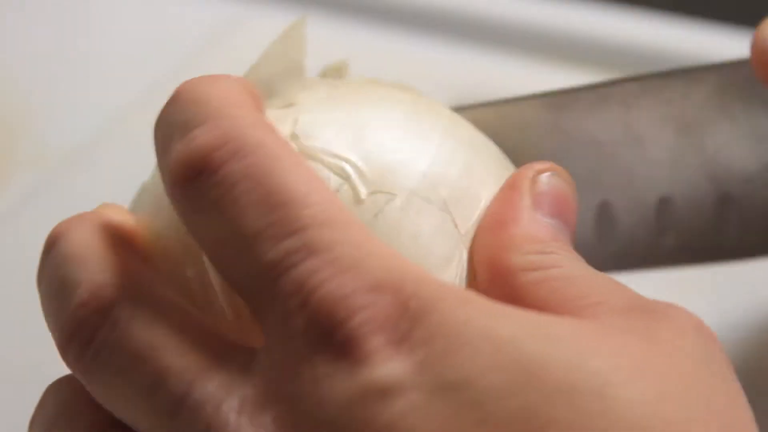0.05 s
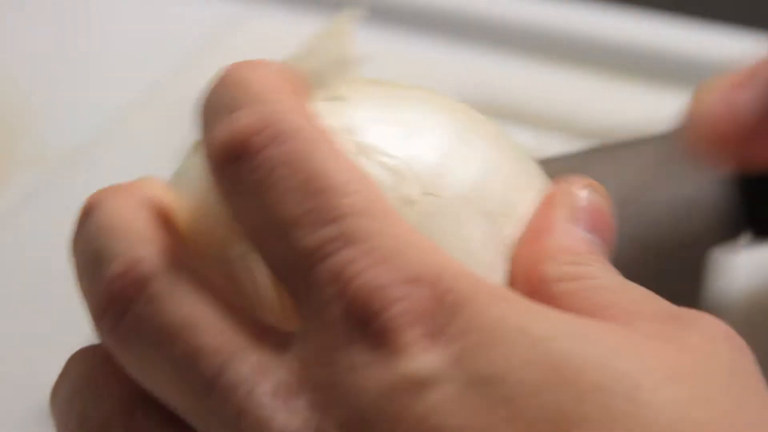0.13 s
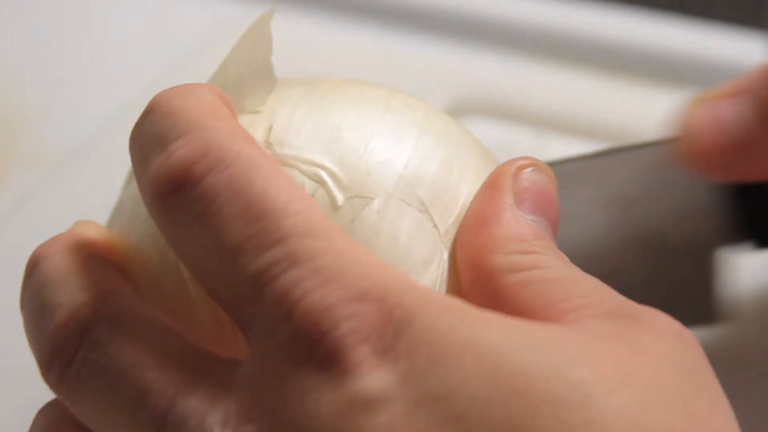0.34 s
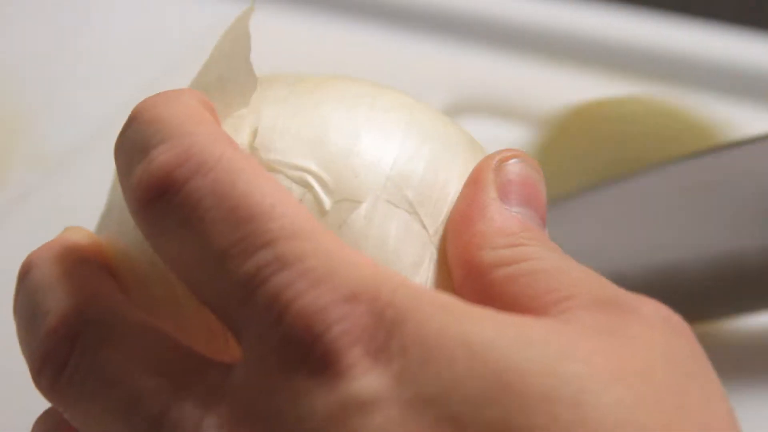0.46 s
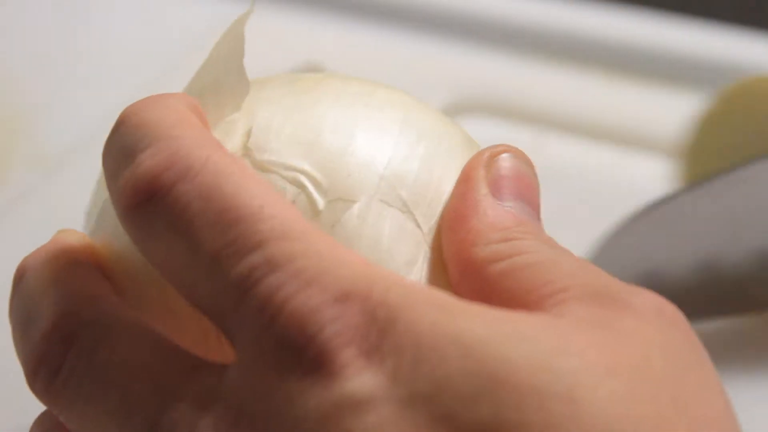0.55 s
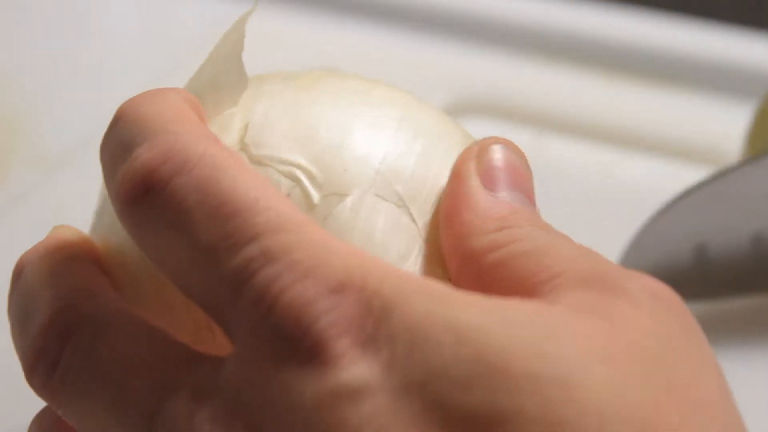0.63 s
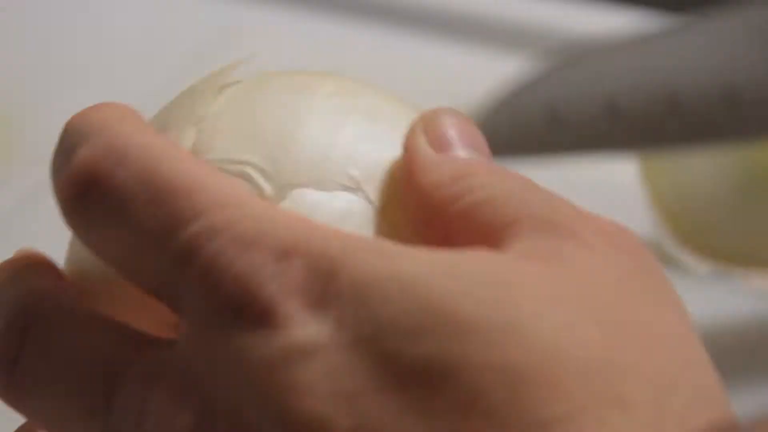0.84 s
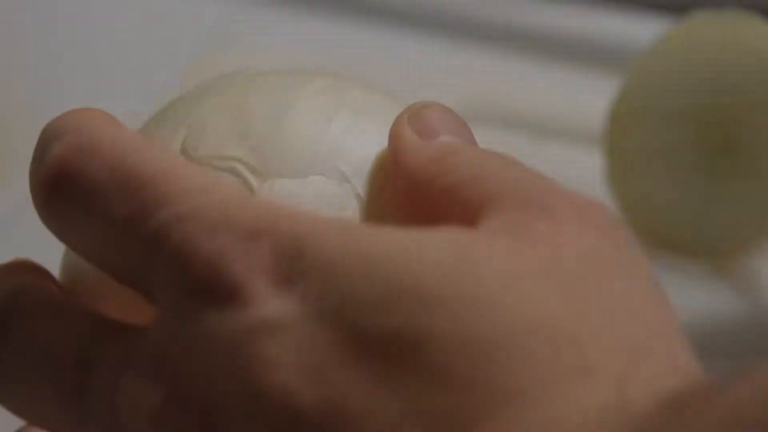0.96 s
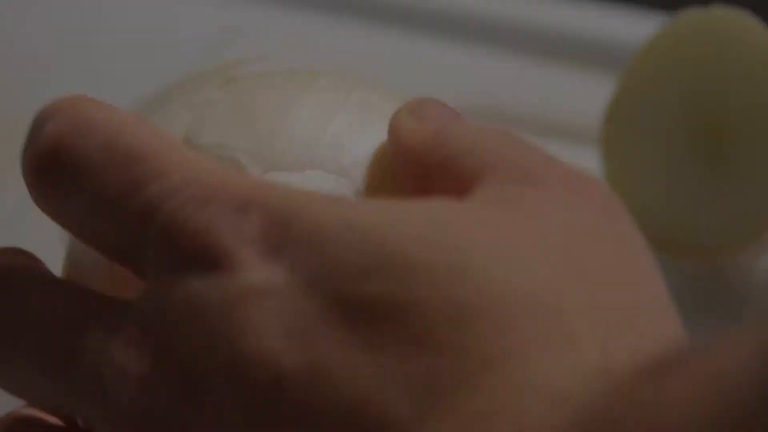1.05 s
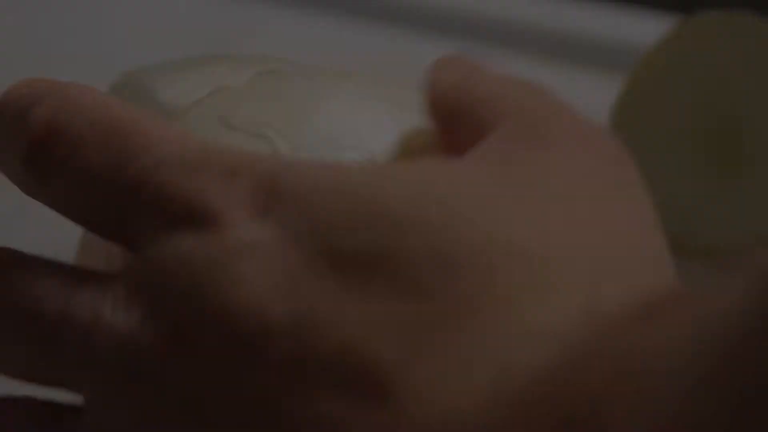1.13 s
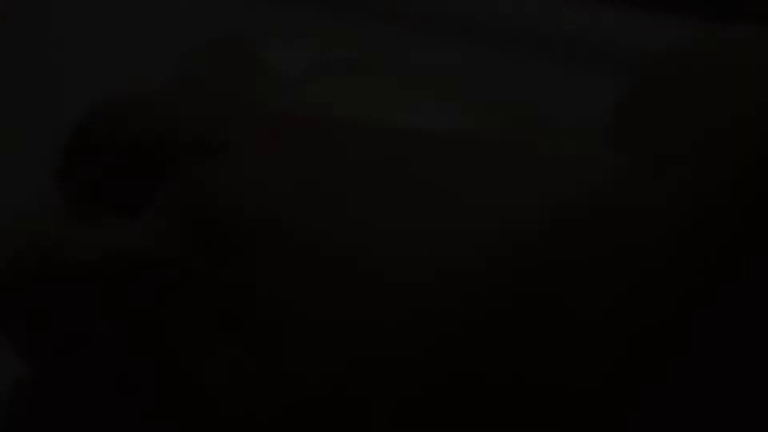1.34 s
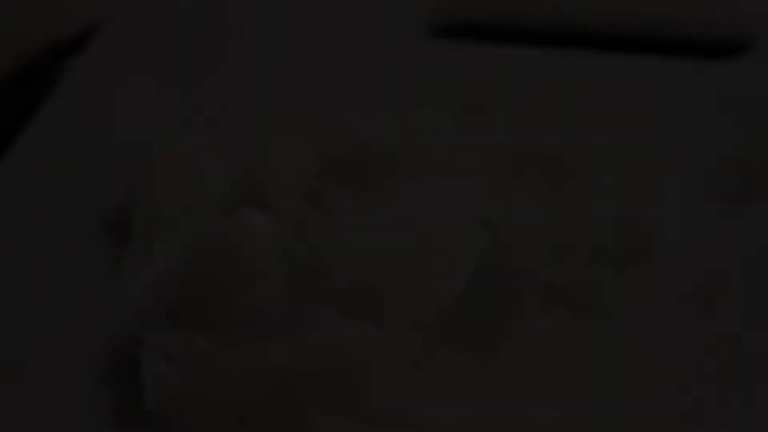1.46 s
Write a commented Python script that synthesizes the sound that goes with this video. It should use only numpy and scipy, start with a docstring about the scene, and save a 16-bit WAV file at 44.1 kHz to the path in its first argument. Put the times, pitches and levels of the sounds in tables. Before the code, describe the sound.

An onion is cut up close in a small kitchen. Dry skin snaps as the blade rasps through, crunching fastest around 0.15-0.25 s; a loud hollow chop hits the plastic board at 0.22 s, with small knocks just after. Sharp crackles follow near 0.4 s over a soft, faintly groaning scrape until 0.75 s. A light knock comes at 0.8 s, then sparse papery snaps and finger rustles to about 1.45 s over faint room noise.

```python
"""Knife through an onion

A kitchen knife rasps down through an onion (dense grains of noise) and chops onto a plastic board
(damped modes, thud, crack). The blade scrapes back out over a groaning board and knocks once more.
Dry skin snaps throughout (short resonant bursts), then also rustles under the fingers (grains again).
Close, nearly mono pickup in a small kitchen: only reflections and the noise floor have width.
"""
import sys
import numpy as np
from scipy import signal
from scipy.fft import rfft, irfft, next_fast_len
from scipy.io import wavfile
from scipy.ndimage import map_coordinates

SR = 44100
rng = np.random.default_rng(int(sys.argv[2]) if len(sys.argv) > 2 else 0)


def log_audio(samples):
    """Write samples as a 16-bit WAV file to the path given in sys.argv[1]."""
    # one column per channel
    frames = np.atleast_2d(samples).T
    # limit to full scale, then quantise
    limited = np.clip(frames, -1, 1)
    pcm = np.round(limited * 32767).astype(np.int16)
    wavfile.write(sys.argv[1], SR, pcm)


N = 66150

NEAR_DELAY_S = 0.0026  # no reflection arrives earlier


def amp(db):
    """Amplitude factor of a level in dB."""
    return 10 ** (np.asarray(db) / 20)


def unit(x):
    """x at rms 1."""
    return x / np.sqrt(np.mean(x ** 2) + 1e-20)


def along(points, hz):
    """Interpolate (Hz, value) points on a log frequency axis."""
    f, v = np.transpose(points)
    return np.interp(np.log(hz + 1), np.log(f + 1), v)


def clock():
    """Time of each sample, s."""
    return np.arange(N) / SR


def level(rows):
    """Gain per sample from (s, dB) points; -120 dB outside them."""
    s, db = np.transpose(rows)
    return amp(np.interp(clock(), s, db, left=-120, right=-120))


def filtered(x, response):
    """x times a response of frequency, zero-padded by at least 0.5 s."""
    m = next_fast_len(N + SR // 2)
    spectrum = rfft(x, m) * response(np.fft.rfftfreq(m, 1 / SR))
    return irfft(spectrum, m)[..., :N]


def coloured(x, colour):
    """x shaped by (Hz, dB) points, at rms 1."""
    return unit(filtered(x, lambda f: amp(along(colour, f))))


def band(hz, q):
    """Noise through two equal resonances in series, at rms 1."""
    def resonance(f):
        damping = 1j * f * hz / q
        return (damping / (hz * hz - f * f + damping)) ** 2
    return unit(filtered(rng.standard_normal(N), resonance))


def burst(noise, envelope):
    """Noise under an envelope, holding exactly the envelope's energy."""
    x = noise * envelope
    return x * np.linalg.norm(envelope) / (np.linalg.norm(x) + 1e-20)


def tear(s, length, fall):
    """Exponential rise up to s, hold for length, exponential fall."""
    rise_s = 0.00077
    t = clock() - s
    return np.exp(np.minimum(t, 0) / rise_s - np.maximum(t - length, 0) / fall)


def grains(colour):
    """Dense tiny fractures of uneven size whose strength flutters; rms 1."""
    grains_per_s, spread_db = 4000, 2.5
    flutter_db, flutter_per_s = 1.5, 170
    fractures = (rng.random(N) < grains_per_s / SR) * rng.choice([-1, 1], N)
    sizes = amp(spread_db * rng.standard_normal(N))
    clumps = map_coordinates(rng.standard_normal(N // 10), [clock() * flutter_per_s])
    return coloured(fractures * sizes * amp(flutter_db * clumps), colour)


def ring(modes, t, contact):
    """Damped modes, set moving by a contact of the given length at t = 0."""
    total = 0
    for hz, db, t60 in modes:
        decay = amp(db + rng.normal(0, 1) - 60 * t / t60)  # each mode's level varies by about 1 dB
        total = total + decay * np.cos(2 * np.pi * hz * t)
    return (1 - np.exp(-t / contact)) * total


def floor():
    """Mid and side of the room's rumble and faint hiss: steady coloured noise."""
    # noise spectrum: f/Hz, density/dB
    floor_colour = [(20, -2.5), (40, -0.5), (70, -14.5), (110, -26), (160, -21), (215, -10.5), (330, -18.5),
                    (1000, -23), (3000, -28), (7000, -22.5), (15500, -25.5)]
    # stereo width: f/Hz, side re mid/dB
    floor_width = [(30, -3.5), (200, -16), (1000, -11.5), (3000, -4.5), (10000, 1)]
    floor_db = -64
    mid, side = amp(floor_db) * coloured(rng.standard_normal((2, N)), floor_colour)
    return np.array([mid, filtered(side, lambda f: amp(along(floor_width, f)))])


def slicing():
    """The edge breaks through skin and cells: many tiny fractures."""
    # blade going through the onion: t/s, level/dB
    slice_level = [(0, -44), (.024, -46), (.04, -45.5), (.066, -39.5), (.088, -39.5), (.115, -44.5),
                   (.136, -57), (.158, -51.5), (.168, -35), (.192, -34.5), (.218, -30.5), (.235, -33.5),
                   (.265, -37.5), (.285, -45), (.31, -43), (.34, -67)]
    # slicing spectrum: f/Hz, density/dB
    slice_colour = [(200, -44.5), (380, -23.5), (550, -3.5), (850, -15), (1250, -4), (2000, -14),
                    (4200, -8.5), (6600, 1), (9000, -5.5), (12500, -5), (15500, -11.5)]
    return level(slice_level) * grains(slice_colour)


def snaps():
    """A flake of skin tears at its own pitch and knocks the bulb; each scatters from its own place."""
    # dry skin snapping: t/s, level/dB, pitch/Hz, Q/1, tear length/s, bulb knock re flake/dB
    snap_rows = [(0.017, -42, 6950, 0.95, 0.0057, -9), (0.024, -39.5, 7000, 0.45, 0.0059, -10.5),
                 (0.0747, -24.5, 7760, 1.7, 0.00011, -34), (0.078, -30.5, 8440, 1.1, 0.0004, -13),
                 (0.1626, -34, 11000, 0.41, 0.0011, -12.5), (0.1667, -27, 7840, 1.4, .0004, -51),
                 (0.1726, -28, 6840, 0.8, 0.00052, -16), (0.2603, -28.5, 9700, 1.7, 0.00055, 0),
                 (0.395, -43, 7100, 7.1, .0004, -29), (0.4039, -29.5, 7940, 8.2, 0.00019, -27),
                 (0.415, -32, 6600, 0.24, 0.0072, -15), (0.417, -24.5, 12200, 1.35, .001, -27),
                 (0.445, -42.5, 5760, 1.4, 0.0057, -41), (.526, -46, 8100, 1.2, 0.0014, -32),
                 (0.5756, -46, 10300, 3.1, 0.00082, -12.5), (0.5898, -35, 8100, 1.2, 0.00014, -30.5),
                 (0.6019, -39.5, 7370, 0.66, 0.00017, -34), (0.6388, -44, 6570, 0.69, 0.00022, -20),
                 (0.6758, -42.5, 12200, 1.2, 0.0011, -35), (.692, -50, 6130, 1.17, 0.0012, -18),
                 (0.8, -45, 6700, 2.7, .005, -20), (0.8163, -40, 7900, 0.3, 0.0013, -3),
                 (0.8825, -40, 7300, 1.3, 0.001, -7.5), (.9079, -35.5, 7790, 1.55, 0.0023, -22),
                 (0.9178, -35, 8700, 1.84, 0.00082, -9), (0.9609, -51.5, 7030, 0.9, 0.00039, -6.5),
                 (0.9676, -40.5, 10090, 0.95, 0.00091, -31), (1.1231, -33, 9200, 1.04, 0.0059, -51),
                 (1.1814, -30.5, 7600, 1.6, 0.0022, -27), (1.1841, -42, 2600, 4.2, 0.00057, -37),
                 (1.3523, -42.5, 8560, .5, 0.00023, -35), (1.435, -46.5, 6950, 0.53, 0.00049, -24)]
    # weighting of the flakes: f/Hz, gain/dB
    skin_colour = [(500, -26), (1500, -12.5), (2600, -8), (4000, 3), (15500, 2)]
    flake_fall_s = 0.00085
    bulb_hz, bulb_q, bulb_fall_s = 1330, 4.5, .0018
    out = np.zeros((2, N))
    for s, db, hz, q, length, bulb_db in snap_rows:
        flake = burst(coloured(band(hz, q), skin_colour), tear(s, length, flake_fall_s))
        bulb = burst(band(bulb_hz, bulb_q), tear(s, length, bulb_fall_s))
        out += scattered(amp(db) * (flake + amp(bulb_db) * bulb))
    return out


def groans():
    """The blade catches and makes the board groan: narrow noise swelling and fading."""
    # groans: t/s, length/s, level/dB, f/Hz
    groan_rows = [(0.08, 0.017, -54, 594), (0.43, 0.075, -53.5, 715), (0.618, 0.051, -59.5, 620),
                  (0.676, 0.078, -55.5, 584)]
    groan_q = 6
    out = np.zeros(N)
    for s, length, db, hz in groan_rows:
        phase = np.clip((clock() - s) / length, 0, 1)
        swell = np.sin(np.pi * np.sqrt(phase))  # peaks a quarter of the way in
        out += amp(db) * burst(band(hz, groan_q), swell)
    return out


def chops():
    """Each blow cracks and rings board and blade; only mid-board blows thud and move the worktop."""
    # blows: t/s, level/dB, edge crack/dB rel., steel ring/dB rel., contact time/s, place on the board
    chop_rows = [(0.2200, 2, 0, -6, 0.0004, "middle"), (.2565, -25, -3, -12.5, .003, "middle"),
                 (0.2623, -22.5, 4.5, -18, 0.00084, "middle"), (.7968, -26, -2, -21, 0.0012, "rim")]
    # modes of the board with the onion on it: f/Hz, struck mid-board/dB, struck at the rim/dB, t60/s
    board = [(377, -12.5, -21, .06), (519, -20.5, -17, .045), (605.7, -17.5, -11, .045),
             (734, -21, -13, .04), (789.6, -17, -15.5, 0.044), (1018, -10.5, -18, 0.037),
             (1190, -16.5, -11, 0.054), (1245.4, -18.5, -12.5, .05), (1414, -15, -19, 0.049),
             (1817, -33, -17.5, 0.065), (2386, -22.5, -20, 0.036)]
    # modes of the blade: f/Hz, level/dB, t60/s
    steel = [(5540, -31, 0.15), (6340, -41, 0.11), (8130, -32, 0.19)]
    # modes of the worktop: f/Hz, level/dB, t60/s
    push = [(65, -39.5, 0.14), (118, -43, 0.077), (93, -55.5, 0.54), (161, -56.5, 0.33)]
    # crack of the edge landing: f/Hz, density/dB
    crack_colour = [(900, -7), (2050, -2), (2650, 5), (4000, -0.5), (7200, -2), (9500, -15.5),
                    (15500, -29.5)]
    thud_db, thud_t60_s, thud_low_hz, thud_high_hz = -10, 0.043, 330, 1340
    crack_level_db, crack_t60_s = -15.5, 0.031
    shove_db = 1  # single shove opening a thud, re the crush that follows
    blow_low_hz = 300  # low cut: keeps the summed modes and thud from booming in the bass
    body = signal.butter(4, [thud_low_hz, thud_high_hz], "band", fs=SR, output="sos")
    low_cut = signal.butter(6, blow_low_hz, "high", fs=SR, output="sos")

    out = np.zeros(N)
    for s, db, crack_db, steel_db, contact, place in chop_rows:
        t = np.maximum(clock() - s, 0)
        middle = place == "middle"

        fade = (t > 0) * amp(thud_db - 60 * t / thud_t60_s)
        shove = signal.unit_impulse(N, round(s * SR)) * amp(shove_db) * np.linalg.norm(fade)
        crush = rng.standard_normal(N) * fade
        thud = signal.sosfilt(body, shove + crush)
        thud = thud * np.linalg.norm(fade) / np.linalg.norm(thud)

        crack_fade = (t > 0) * amp(crack_level_db - 60 * t / crack_t60_s)
        crack = burst(coloured(rng.standard_normal(N), crack_colour), crack_fade)

        modes = [(hz, middle_db if middle else rim_db, t60) for hz, middle_db, rim_db, t60 in board]
        blow = ring(modes, t, contact) + middle * thud
        blow = blow + amp(crack_db) * crack + amp(steel_db) * ring(steel, t, contact)
        worktop = middle * ring(push, t, contact)
        out += amp(db) * (signal.sosfilt(low_cut, blow) + worktop)
    return out


def drawing():
    """The blade scrapes back along the board: grains again, darker."""
    # blade drawn back: t/s, level/dB
    draw_level = [(.37, -55), (.41, -50.5), (.445, -48), (.49, -49), (.53, -50.5), (.565, -54),
                  (.61, -55.5), (.665, -63.5), (.693, -55), (.715, -62.5), (.77, -67.5)]
    # scraping spectrum: f/Hz, density/dB
    draw_colour = [(200, -15.5), (380, -5.5), (560, -2.5), (760, -0.5), (900, -4), (1180, 0.5), (2000, -16),
                   (3500, -9), (7000, -7), (15500, -12)]
    return level(draw_level) * grains(draw_colour)


def rubs():
    """Fingers shift their grip on the papery skin: grains under Gaussian swells."""
    # finger slides: t of the middle/s, half width (sigma)/s, level/dB
    rub_rows = [(0.88, .016, -55), (0.92, 0.006, -49), (0.967, 0.012, -57.5), (1.139, 0.025, -60),
                (1.18, 0.013, -60), (1.319, 0.005, -59.5), (1.379, 0.012, -57), (1.44, 0.0062, -62.5)]
    # rustle spectrum: f/Hz, density/dB
    rub_colour = [(300, -12), (900, -8), (1350, -1), (2200, -6.5), (4000, -2.5), (8000, 3), (11500, -1),
                  (15500, -15)]
    swells = sum(amp(db) * np.exp(-((clock() - s) / width) ** 2 / 2) for s, width, db in rub_rows)
    return grains(rub_colour) * swells


def scattered(x):
    """Mid and side of a sound plus the treble that hands and worktop throw back at once."""
    near_db, near_t60_s, near_low_hz = -8.5, 0.072, 1800
    t = clock()[:SR // 12]
    high_pass = signal.butter(2, near_low_hz, "high", fs=SR, output="sos")
    near = signal.sosfilt(high_pass, rng.standard_normal((2, len(t))))
    near = near * amp(-60 * t / near_t60_s) * (t > NEAR_DELAY_S)
    near = near / np.linalg.norm(near[0])
    mid, side = amp(near_db) * signal.oaconvolve(x[None], near, axes=1)[:, :N]
    return np.array([x + mid, side])


def kitchen(x):
    """Mid and side of the room's tail: noise in which each frequency dies at its own speed."""
    # room decay: f/Hz, t60/s
    room_t60 = [(100, 0.54), (400, 0.28), (1300, .25), (2400, .32), (7000, 0.15), (15000, 0.1)]
    kitchen_db = -13.5
    hz, t, z = signal.stft(rng.standard_normal((2, SR // 2)), SR, nperseg=256)
    decay = amp(-60 * t / along(room_t60, hz)[:, None])
    tail = signal.istft(z * decay, SR, nperseg=256)[1]
    tail = tail * (clock()[:tail.shape[1]] > NEAR_DELAY_S)
    tail = tail / np.linalg.norm(tail[0])
    return amp(kitchen_db) * signal.fftconvolve(x[None], tail, axes=1)[:, :N]


def scene():
    """All sources in the middle; only reflections and the floor differ between the ears."""
    # width of the reflections: f/Hz, side gain/dB
    reflection_width = [(100, -7), (500, -35.5), (2000, -31.5), (5000, -16), (10000, -7.5)]
    dry_sources = (slicing(), groans() + drawing(), chops(), rubs())
    sources = [snaps()] + [scattered(x) for x in dry_sources]
    mid, side = sum(x + kitchen(x[0]) for x in sources)
    side = filtered(side, lambda f: amp(along(reflection_width, f)))
    mid, side = np.array([mid, side]) + floor()
    return np.array([mid + side, mid - side])


def record(dry):
    """Clip at full scale, then cut steeply above the band limit."""
    top_hz = 15850
    return filtered(np.clip(dry, -1, 1), lambda f: 1 / (1 + (f / top_hz) ** 120))


dry = scene()
out = record(dry)
log_audio(out)
```